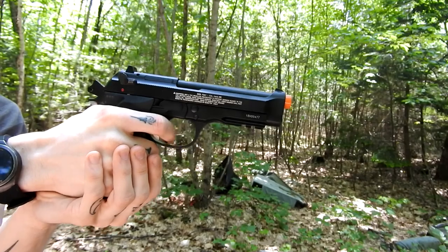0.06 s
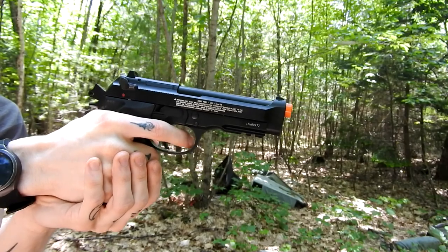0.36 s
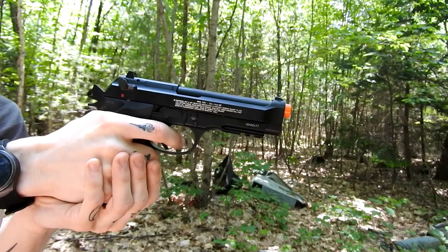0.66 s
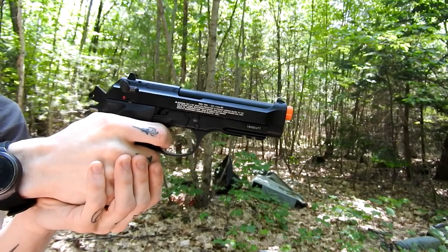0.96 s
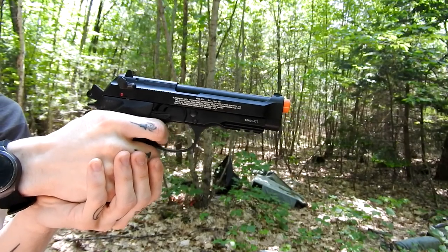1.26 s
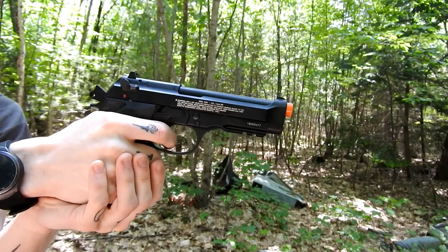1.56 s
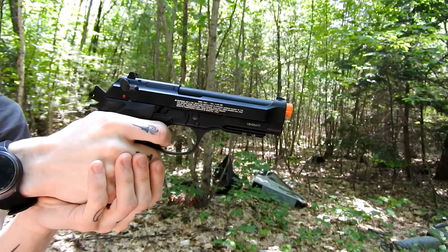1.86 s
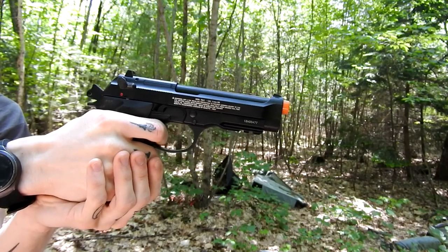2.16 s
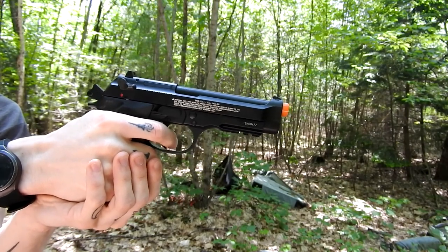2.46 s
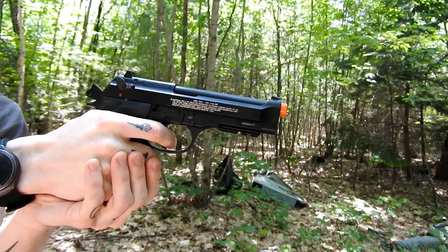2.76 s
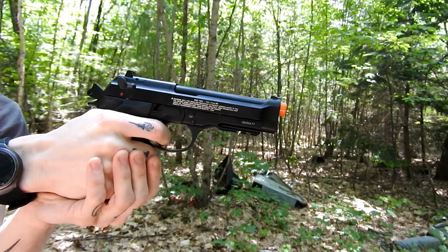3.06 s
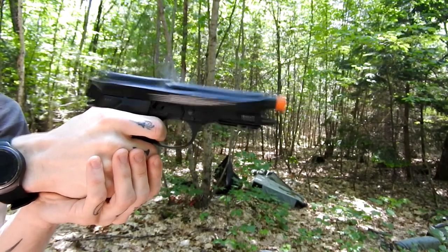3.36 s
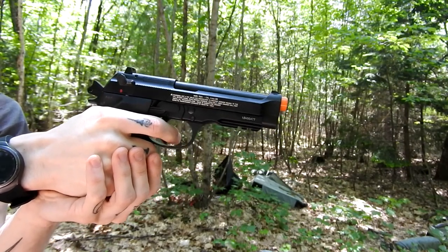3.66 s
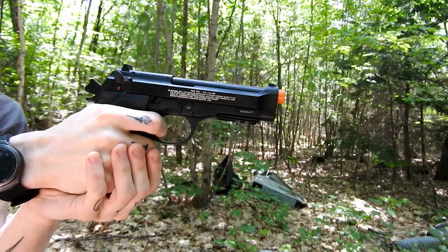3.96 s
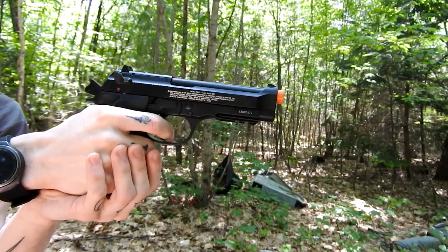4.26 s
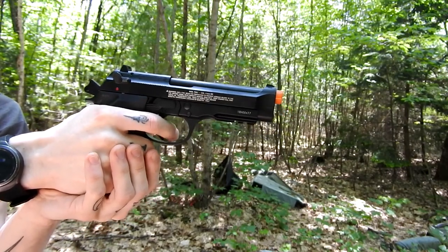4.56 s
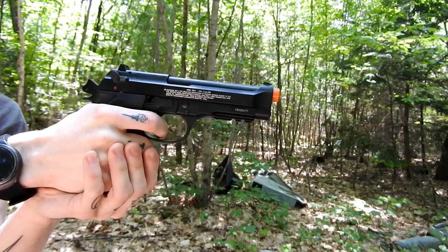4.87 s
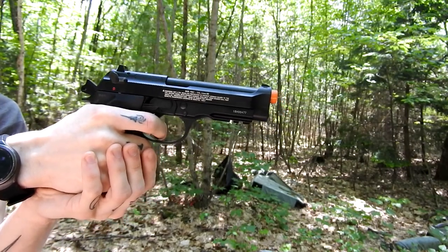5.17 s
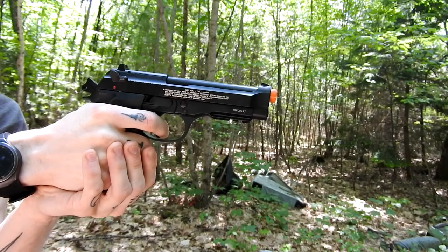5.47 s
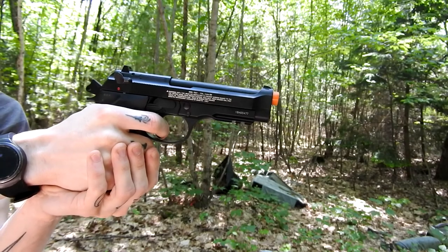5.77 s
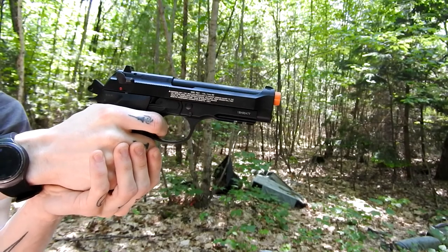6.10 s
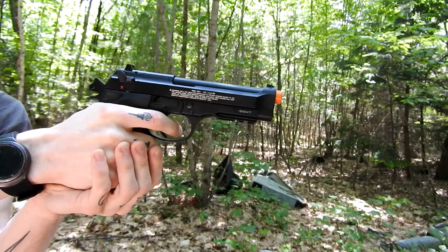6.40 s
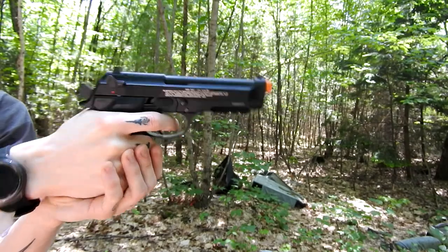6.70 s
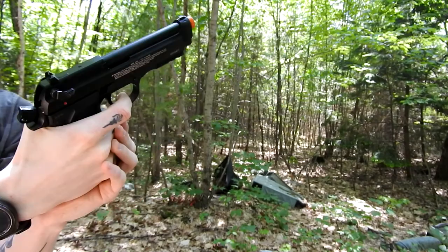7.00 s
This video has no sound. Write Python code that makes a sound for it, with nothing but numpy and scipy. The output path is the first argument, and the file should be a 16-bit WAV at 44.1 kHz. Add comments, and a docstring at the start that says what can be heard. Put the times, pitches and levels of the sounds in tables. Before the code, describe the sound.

Close, irregularly spaced airsoft pistol shots crack with a puff of gas, a metallic slide clack and a short woodland echo.

```python
"""In a wood, a gas blowback airsoft pistol fires single shots close to a camera.
Each shot is a hammer tick, a crack and a blast of gas; the slide hits its rear stop and slams shut,
then the trigger clicks back. Trees scatter the sound and pellets land in leaves. Two far bangs roll
through the wood over a faint hiss and a low drone. The camera turns itself down at each shot
and lets the background creep back up."""
import sys
import numpy as np
from scipy import signal
from scipy.fft import rfft, irfft
from scipy.io import wavfile
from scipy.ndimage import uniform_filter1d

SR = 44100
rng = np.random.default_rng(int(sys.argv[2]) if len(sys.argv) > 2 else 0)


def to_wav(sig):
    """Store sig (one row per channel, or 1-D mono) as 16-bit WAV at the path in sys.argv[1].

    Samples outside -1..1 are clipped; the rate is SR.
    """
    pcm = np.clip(np.atleast_2d(sig), -1, 1) * 32767
    pcm = np.round(pcm).astype(np.int16)
    wavfile.write(sys.argv[1], SR, pcm.T)  # frames by channels


N = 319284
T = np.arange(N) / SR
FILTER_SIZE = 4096
FREQS = np.fft.rfftfreq(FILTER_SIZE, 1 / SR)
SLIDE_RETURN_S = .0146  # the spring always takes this long to shut the slide


def amp(db):
    """Turn decibels into a number to multiply by."""
    return 10 ** (np.asarray(db) / 20)


def curve(points):
    """Join (f/Hz, value) points with straight lines on a pitch scale."""
    hz, value = np.transpose(sorted(points))
    return np.interp(np.log(FREQS + 1), np.log(hz), value)


def causal(gain):
    """Build the quickest filter with these gains that never answers before its input."""
    cepstrum = irfft(np.log(np.maximum(gain, 1e-6)))
    cepstrum[..., 1:FILTER_SIZE // 2] *= 2
    cepstrum[..., FILTER_SIZE // 2 + 1:] = 0
    return irfft(np.exp(rfft(cepstrum)))


def through(x, response):
    """Pass both channels through a filter."""
    return signal.oaconvolve(x, np.atleast_2d(response), axes=-1)[:, :N]


def colour(x, tone, pan=None):
    """Shape a sound by tone (f/Hz, relative level/dB) and pan (f/Hz, left minus right/dB)."""
    gain = amp(curve(tone))
    gain = gain / np.sqrt(np.mean(gain ** 2))
    if pan is not None:
        gain = gain * amp(np.outer([.5, -.5], curve(pan)))
    return through(x, causal(gain))


def low_cut(x, hz):
    """Take away the bass below hz."""
    return signal.sosfilt(signal.butter(3, hz, "high", fs=SR, output="sos"), x)


# How alike the two microphones hear near and widely spread sounds: f/Hz, likeness (1 = the same)
NEAR_LIKENESS = [(200, 0.91), (1000, 0.96), (3000, 0.99), (5500, 0.99), (9000, 0.17), (14000, 0.28)]
WIDE_LIKENESS = [(100, 0.87), (700, 0.79), (1500, 0.79), (3000, 0.68), (5500, 0.76), (9000, 0.13),
                 (14000, .1)]
def noise(likeness):
    """Stereo hiss whose left and right are as alike as the table says."""
    alike = np.clip(curve(likeness), -1, 1)
    shares = np.sqrt(np.array([1 + alike, 1 - alike]) / 2)
    mid, side = through(rng.standard_normal((2, N)), causal(shares))
    return np.array([mid + side, mid - side])


def burst(start, rise, fade):
    """A loudness shape that swells, then dies away. Times are in s; a fade is a drop of 60 dB."""
    out = np.zeros(N)
    span = slice(max(int(start * SR), 0), max(int((start + 2 * fade) * SR), 0))
    age = np.maximum(T[span] - start, 0)
    out[span] = (1 - np.exp(-(age / rise) ** 2)) * np.exp(-np.log(1000) * age / fade)
    return out


def flutter(rate, depth_db):
    """A multiplier that wanders at random, rate times a second."""
    steps = rng.standard_normal(N)
    return amp(depth_db * np.interp(T * rate, np.arange(N), steps))


def ring(notes):
    """The fading notes of an object tapped once."""
    t = T[:SR // 8]
    return sum(amp(db) * np.sin(2 * np.pi * hz * t) * np.exp(-np.log(1000) * t / fade)
               for hz, db, fade in notes)


# The notes of the slide and frame: f/Hz, level/dB, fade/s
METAL_NOTES = [(795, -3.5, 0.021), (1114, -0.5, 0.054), (1277, -1.5, .05), (1412, -3.5, .05),
               (1923, 1, 0.052), (2820, -1, 0.043), (3267, -2.5, 0.069), (4266, -7.5, 0.055),
               (4970, -3.5, 0.041), (5770, -2, .04), (5820, 1.5, 0.046), (6630, -3.5, .06), (6900, -7, .04),
               (6900, -4.5, .04), (8420, 1.5, 0.055), (9200, -3.5, 0.051), (9900, -3.5, .04),
               (10000, 0.5, 0.03)]
def metal(x, ring_db):
    """Add the ring of the slide and frame, which answer a moment after being hit."""
    body = np.pad(ring(METAL_NOTES), (int(.0004 * SR), 0))
    return x + amp(ring_db) * through(x, body / np.linalg.norm(body))


# The shots: t/s, level/dB, thump level/dB, time until the slide is shut again/s
SHOTS = [(-0.0225, -2.5, -3.5, 0.039), (1.2077, 0, 1, 0.036), (2.1368, -0.5, -2, 0.038),
         (3.4765, 0, 2, 0.04), (4.1697, 0, -5.5, .0402), (6.2987, 0.5, 2, 0.04)]
# The gun sits left of centre: f/Hz, left minus right/dB
GUN_PAN = [(300, 0.5), (1300, -5), (2500, -0.5), (3500, 1), (4900, 2.5), (6000, -1), (7200, 5.5), (8800, 3),
           (10000, 8), (12000, 5), (14000, -1.5)]
# The tone of the slide's clack: f/Hz, level/dB
SLIDE_TONE = [(60, -17.5), (200, -17), (600, -22.5), (1300, -11.5), (2800, -8), (3800, -8), (4800, -3.5),
              (7000, -1), (10300, -4), (11800, -14), (13500, -29), (16000, -38.5)]
def hammer_and_slide(hammer_lead_s=.012):
    """The hammer trips; the slide scrapes back, hits its stop, bounces and shuts with a thinner click."""
    heavy, light = np.zeros(N), np.zeros(N)
    for t, db, _, cycle in SHOTS:
        shut = t + cycle
        rear = shut - SLIDE_RETURN_S
        light += amp(db - 32) * burst(t - hammer_lead_s, .00022, .02)
        heavy += amp(db - 9) * burst(rear - .005, .0013, .04)  # scrape
        heavy += amp(db + 4) * burst(rear, .00037, .024)
        heavy += amp(db - 2.5) * burst(rear + .0036, .00033, .016)  # bounce
        light += amp(db - 4.5) * burst(shut, .0003, .022)
    grain = noise(NEAR_LIKENESS)
    knock = colour(grain * heavy, [(200, 1), (600, 1.5), (1300, 3.5), (3000, 1), (12000, 1.5)])
    click = colour(grain * light, [(1000, -5), (3000, -1.5), (5000, -1), (10000, 1.5), (14000, -.5)])
    return amp(6.5) * colour(metal(knock + click, ring_db=-15.5), SLIDE_TONE, GUN_PAN)


# The tones of the sharp crack, the first fat puff and the hiss of gas: f/Hz, level/dB
CRACK_TONE = [(60, -5.5), (300, -2.5), (620, -7.5), (900, -5), (1400, -7.5), (2000, -2.5), (3300, -2),
              (4600, -2.5), (7500, -0.5), (10300, -1), (12000, -13), (13500, -23.5), (16000, -26.5)]
PUFF_TONE = [(50, -21), (90, -2), (250, 0), (400, 2), (550, -5.5), (750, -2), (1050, -5.5), (1250, -2),
             (1600, -7), (2600, -5.5), (3800, -15), (14000, -41)]
GAS_TONE = [(180, -41.5), (300, -11.5), (787, -16), (2840, -4.5), (3760, -11), (4520, -2.5), (5900, -1),
            (6740, -3), (8090, -0.5), (8790, -4), (10400, -5.5), (11700, -10.5), (13800, -28),
            (16000, -36.5)]
def muzzle(valve_lead_s=.010, ground_echo_s=.0058):
    """The valve leaks, the pellet leaves with a crack and a puff; gas hisses until the slide is back."""
    snap, push, flow = np.zeros((3, N))
    for t, db, thump_db, cycle in SHOTS:
        leak = amp(-18.5) * burst(t - valve_lead_s, .0031, .05)
        build_up = amp(-14) * burst(t - .004, .0032, .02)
        ground_echo = amp(.5) * burst(t + ground_echo_s, .001, .049)
        valve_open = np.clip((t + cycle - SLIDE_RETURN_S - T) / .0032 + 1, 0, 1)
        snap += amp(db) * (build_up + burst(t - .0004, .00035, .015))
        push += amp(thump_db) * (leak + burst(t, .0013, .03) + ground_echo)
        flow += amp(db) * burst(t + .0017, .0037, .15) * valve_open
    air = noise([(200, .94), (1000, .84), (5000, 1), (12000, .8)])
    crack = amp(13) * colour(air * snap, CRACK_TONE, pan=[(300, -.5), (1300, -1), (5000, 0)])
    puff = amp(1) * colour(air * push, PUFF_TONE, pan=[(100, 0), (250, 2), (1300, -2.5), (4000, 1)])
    hiss = noise([(200, .7), (1000, .7), (3000, 1), (5500, 1), (9000, .67), (14000, .4)])
    gas = hiss * flow * flutter(rate=330, depth_db=-1)
    return crack + puff + amp(8) * colour(metal(gas, ring_db=-9), GAS_TONE, GUN_PAN)


def close_echoes(x, echo_db=-8, count=14):
    """Hands, arms and the camera throw back faint, quick echoes; the bass bends around them."""
    echoes = np.zeros((2, SR // 100))
    for channel in echoes:
        delays = rng.integers(SR // 3000, SR // 200, count)
        channel[delays] = amp(echo_db) * rng.choice([-1, 1], count) / np.sqrt(count)
    return x + through(x, low_cut(echoes, hz=600))


# The low notes of the gas puff and the kicking gun: f/Hz, level/dB, fade/s
THUMP_NOTES = [(84, 2, 0.078), (176, -3, 0.055), (202, -4, 0.069), (310.3, 0.5, 0.032), (430, -1, 0.018)]
def recoil(ground_echo_s=.0062):
    """A thump: a push as the valve opens, the main kick, its ground echo, a nudge at the rear stop."""
    kicks = np.zeros((2, N))
    for t, _, thump_db, cycle in SHOTS:
        rear = t + cycle - SLIDE_RETURN_S
        pushes = [(t - .006, -13, 0), (t, -2, -1), (t + ground_echo_s, -6, 3), (rear, -25, 0)]
        for when, kick_db, pan_db in pushes:
            if when > 0:
                kicks[:, int(when * SR)] += amp(thump_db + kick_db + np.array([.5, -.5]) * pan_db)
    softened = uniform_filter1d(kicks, int(.0012 * SR) + 1)
    return amp(-3.5) * through(softened, ring(THUMP_NOTES))


# The tones of the near trees and leaves, and of the far wood: f/Hz, level/dB
NEAR_WOOD_TONE = [(59, -55.5), (100, -22.5), (317, -15), (391, -15.5), (1350, -18), (2370, -6.5),
                  (3840, -12.5), (4350, -5), (5720, -0.5), (7830, -1), (9860, -1.5), (11400, -9.5),
                  (12200, -21.5), (13000, -41), (15000, -63)]
FAR_WOOD_TONE = [(200, -16), (700, -2.5), (1400, -3.5), (2300, -1), (3800, -7), (5000, 1.5), (8000, -7.5),
                 (10500, -14), (13000, -40)]
def trees():
    """Near trunks and leaves scatter each shot brightly; the far wood answers later and duller."""
    near, far = np.zeros((2, N))
    for t, db, *_ in SHOTS:
        near += amp(db) * burst(t + .0044, .015, .43)
        far += amp(db) * (burst(t + .013, .027, .95) + amp(-14.5) * burst(t + .19, .035, .44))
    near *= flutter(rate=150, depth_db=.5)
    bright = amp(-10) * colour(noise(WIDE_LIKENESS) * near, NEAR_WOOD_TONE)
    dull = amp(-32.5) * colour(noise(WIDE_LIKENESS) * far, FAR_WOOD_TONE)
    return bright + dull


# The tone of the background hiss: f/Hz, level/dB
HISS_TONE = [(18, -40.5), (30, -12.5), (74, -2.5), (117, -8), (296, -7.5), (495, -8), (624, -8.5),
             (941, -10.5), (1020, -7), (1980, -13), (3320, -13), (3680, -14.5), (4630, -11), (10000, -16.5),
             (14000, -44)]
def background():
    """The wood and the microphones hiss steadily."""
    hiss = colour(noise(WIDE_LIKENESS), HISS_TONE, pan=[(400, 0), (1300, -2), (4400, .3)])
    return amp(-53.5) * low_cut(hiss, hz=42)


def drone(growth_db_per_s=2, rev_start_s=3.57, climb_hz_per_s=68):
    """A faint low hum, perhaps a far engine, wavers and grows; one rev climbs, levels off and fades."""
    hum_hz = 73.5 * flutter(rate=1.8, depth_db=.6)
    hum = amp(-77.5 + growth_db_per_s * T) * np.sin(2 * np.pi * np.cumsum(hum_hz) / SR)
    rev_hz = np.minimum(57 + climb_hz_per_s * np.maximum(T - rev_start_s, 0), 85)
    rev_level = amp(-43.5) * burst(rev_start_s, rise=.1, fade=2)
    return hum + rev_level * np.sin(2 * np.pi * np.cumsum(rev_hz) / SR)


# The trigger springing back: t/s, level/dB, finger pressure (0 to 1)
TRIGGER_RESETS = [(0.1790, -3, 0.3), (1.4246, -3.5, 0.08), (2.3297, -1.5, 0.13), (3.6530, -1, 1),
                  (4.3581, -1.5, 0), (6.4491, -0.5, 0.78)]
# The notes of the trigger's parts: f/Hz, level/dB, fade/s, change at full finger pressure/dB
TRIGGER_NOTES = [(1033, -10.5, 0.025, -5), (2050, -17.5, 0.0067, 11), (3460, -5, 0.0061, -9.5),
                 (5050, -9, 0.005, 0), (6400, -6.5, 0.0064, -1), (7700, 2.5, 0.0033, -10.5),
                 (8480, -1.5, 0.0049, 2.5), (9930, -7, 0.0052, -2), (10450, -16, .006, 2.5),
                 (12700, -12, .006, 0)]
def trigger(pan_db=8.5):
    """The trigger snaps back: a tap and a tiny scrape ring its parts, and the finger changes the tone."""
    clicks, rub = np.zeros((2, N)), noise(NEAR_LIKENESS)
    for t, db, finger in TRIGGER_RESETS:
        scrape = rub * burst(t - .0004, .0007, .0083)
        tap = amp(-11.5) * scrape
        tap[:, int(t * SR)] += 1
        notes = [(hz, level + finger * change, fade) for hz, level, fade, change in TRIGGER_NOTES]
        clicks += amp(db) * (amp(-2) * through(tap, ring(notes)) + amp(-8.5) * scrape)
    tone = [(100, -13), (600, -20.5), (950, -6), (11000, 7.5), (15000, -15)]
    return colour(clicks, tone, pan=[(1200, .0064), (3300, pan_db / 2), (7500, pan_db)])


# The far bangs: t/s, level/dB
BANGS = [(0.392, 3), (1.432, 4.5)]
# The tone of a bang as it first arrives: f/Hz, level/dB
BANG_TONE = [(150, -14.5), (600, -7.5), (1000, -4.5), (1500, -2), (2600, -3), (3800, -5.5), (5000, -11.5),
             (7500, -16.5), (10500, -30), (13000, -50.5)]
# How a bang rolls away, band by band: f/Hz, level/dB, rise/s, fade/s
BANG_ROLL = [(393, -53, 0.41, 4.6), (564, -38, .7, 2.7), (980, -51, 0.25, 3.8), (1440, -47, 0.019, 3.4),
             (2530, -49, 0.028, 2.8), (4800, -56.5, 0.033, 2.5)]
def far_bangs():
    """A thud and a puff arrive smeared by the trees; the highs die first and the lower tones roll on."""
    def swell(rise, fade):
        return sum(amp(db) * burst(t, rise, fade) for t, db in BANGS)
    scatter = noise(WIDE_LIKENESS)
    puff = amp(-35.5) * colour(scatter * swell(rise=.019, fade=.65), BANG_TONE)
    thud_tone = [(30, -9), (70, 8), (160, -4), (400, -17), (2000, -67)]
    thud = amp(-41.5) * colour(scatter * swell(rise=.004, fade=.058), thud_tone)
    roll = np.zeros((2, N))
    for hz, db, rise, fade in BANG_ROLL:
        band_filter = signal.butter(2, [hz / 1.3, hz * 1.3], "band", fs=SR, output="sos")
        band = signal.sosfilt(band_filter, np.roll(scatter, rng.integers(N), axis=1))
        roll += amp(db) * band / band.std() * swell(rise, fade)
    return (puff + thud + roll) * amp([[-.9], [.9]])  # a little to the right


# Pellets brushing leaves, and pellets hitting twigs and bark: t/s, level/dB
RUSTLES = [(1.47, -7), (2.39, -2), (3.80, 0), (4.835, -12), (6.58, 0.5)]
TICKS = [(3.796, 5.5), (4.457, -1), (4.635, -2), (6.571, 5), (6.912, -2.5)]
# The tone of a pellet on wood: f/Hz, level/dB
TICK_TONE = [(200, 0), (1100, -1), (2500, -1), (3800, 2), (6000, 5), (10500, -2), (14000, -33)]
def pellets():
    """Pellets rustle through leaves and tick against wood."""
    brushes = sum(amp(db) * burst(t, .008, .5) for t, db in RUSTLES)
    hits = sum(amp(db) * burst(t, .000494, .026) for t, db in TICKS)
    grain = noise(WIDE_LIKENESS)
    return amp(-37) * colour(grain * brushes, NEAR_WOOD_TONE) + amp(-38) * colour(grain * hits, TICK_TONE)


def scene():
    """The pistol close by, its deep bass trimmed by the microphone, and the wood around it."""
    pistol = close_echoes(muzzle() + hammer_and_slide()) + recoil() + trigger()
    return low_cut(pistol, hz=58.2) + trees() + pellets() + far_bangs() + drone() + background()


def microphone_holes(x, hz=3750, width_hz=500, depth=.24):
    """The openings over the microphones swallow part of a narrow band."""
    b, a = signal.iirpeak(hz, hz / width_hz, fs=SR)
    return x - depth * signal.lfilter(b, a, x)


def auto_volume(x, limit_db=-14, recover_db_per_s=8, window_s=.011, smooth_s=.0028):
    """The camera turns down at once when the sound passes its limit, then steadily turns back up."""
    power = uniform_filter1d(np.mean(x ** 2, axis=0), int(window_s * SR) + 1)
    over_db = np.maximum(10 * np.log10(np.maximum(power, 1e-12)) - limit_db, 0)
    cut_db = np.maximum.accumulate(over_db + recover_db_per_s * T) - recover_db_per_s * T
    return x * amp(-uniform_filter1d(cut_db, int(smooth_s * SR) + 1))


def record(dry, top_hz=16200):
    """The camera colours the sound, sets its volume, rounds the peaks and cuts the highest treble."""
    rounded = np.tanh(auto_volume(microphone_holes(dry)))
    return signal.sosfilt(signal.ellip(8, .2, 70, top_hz, fs=SR, output="sos"), rounded)


dry = scene()
out = record(dry)
to_wav(out)
```